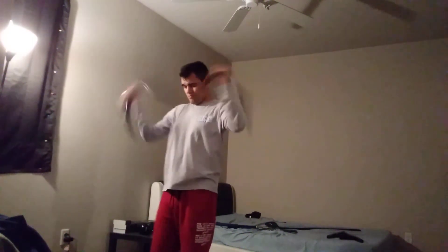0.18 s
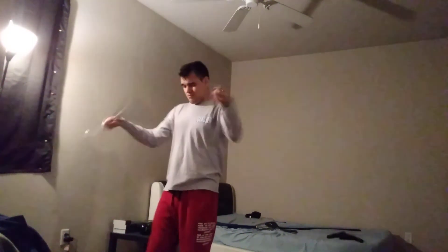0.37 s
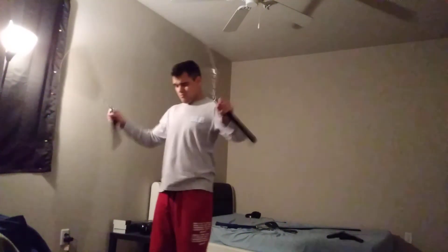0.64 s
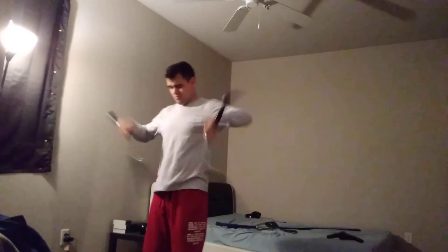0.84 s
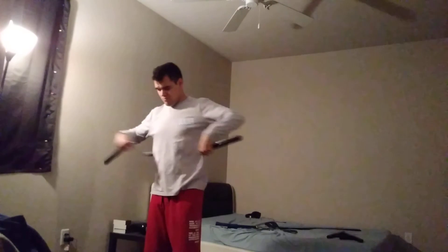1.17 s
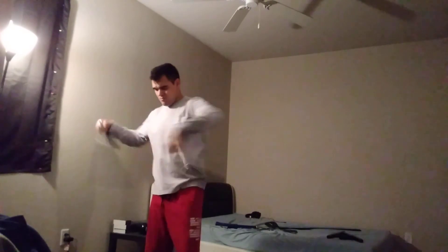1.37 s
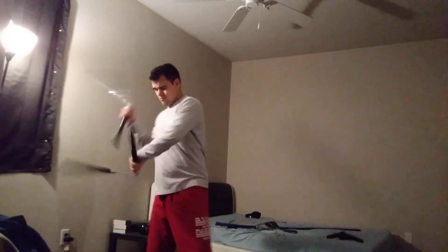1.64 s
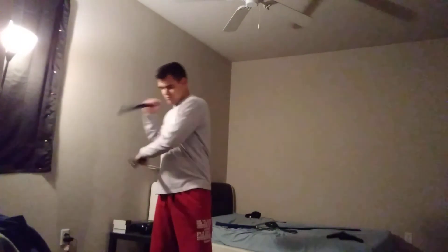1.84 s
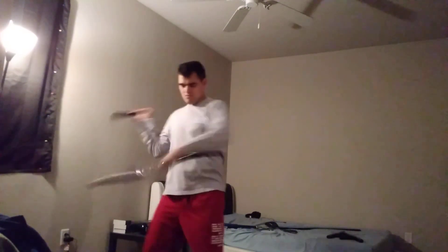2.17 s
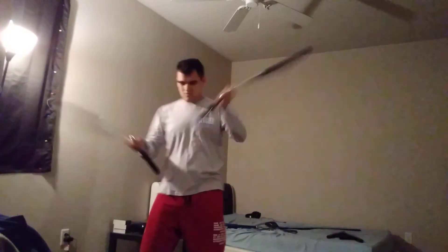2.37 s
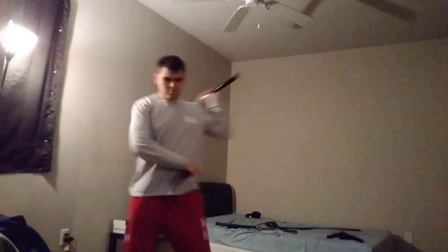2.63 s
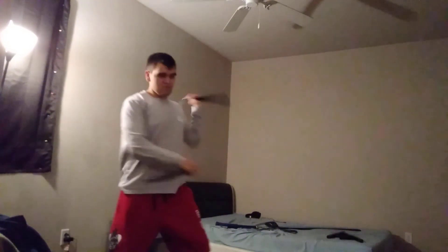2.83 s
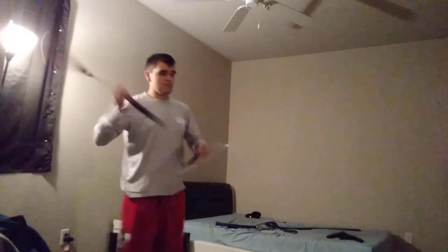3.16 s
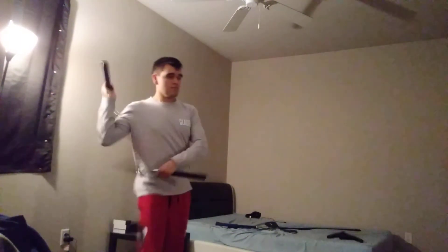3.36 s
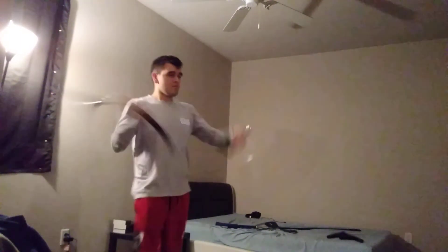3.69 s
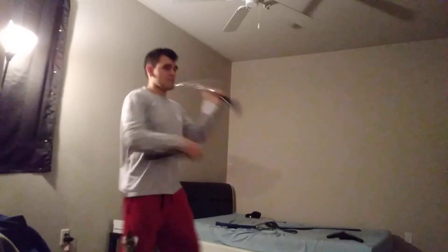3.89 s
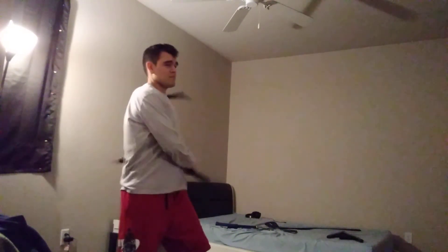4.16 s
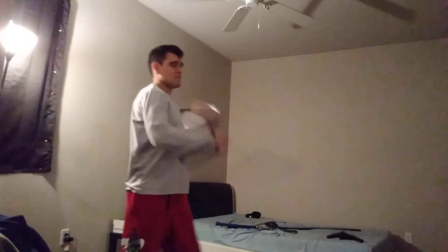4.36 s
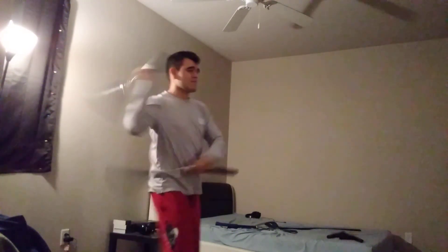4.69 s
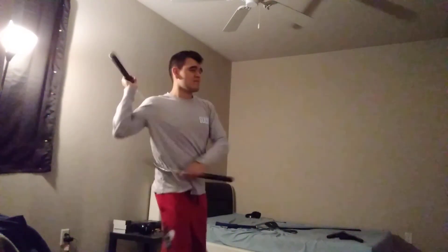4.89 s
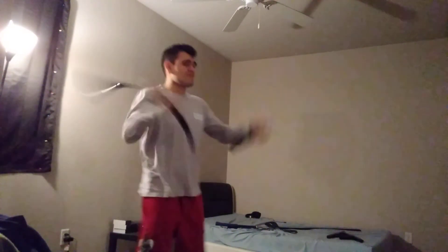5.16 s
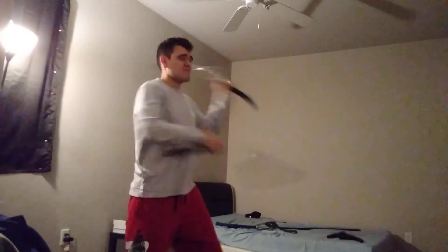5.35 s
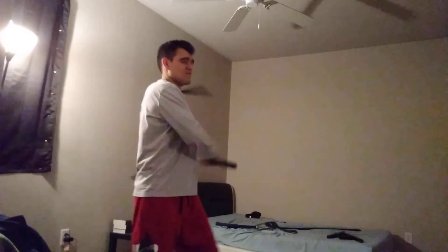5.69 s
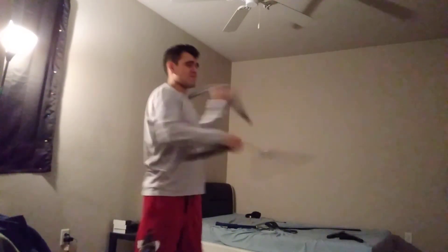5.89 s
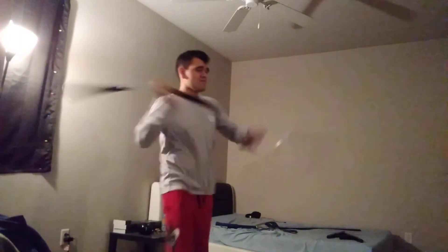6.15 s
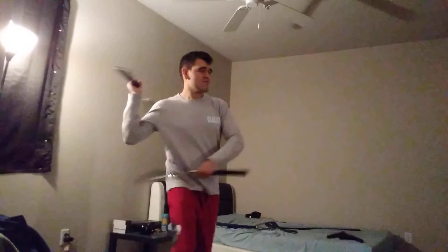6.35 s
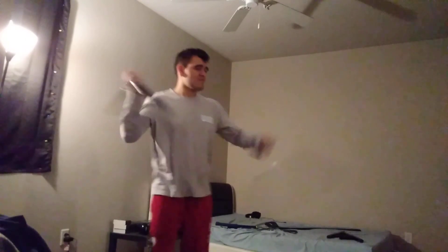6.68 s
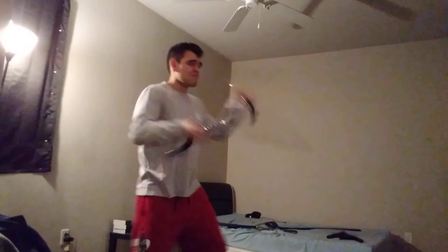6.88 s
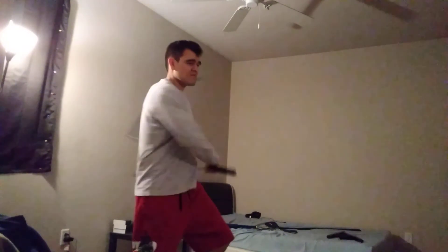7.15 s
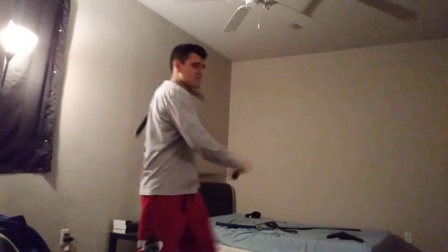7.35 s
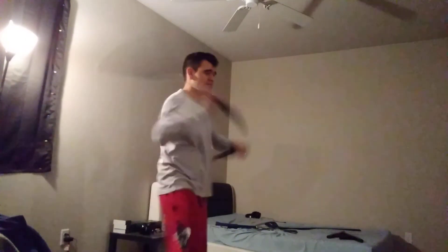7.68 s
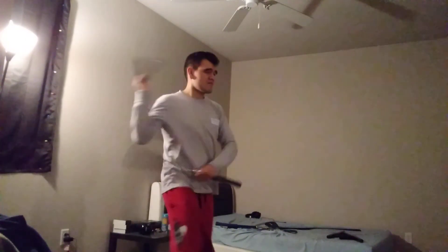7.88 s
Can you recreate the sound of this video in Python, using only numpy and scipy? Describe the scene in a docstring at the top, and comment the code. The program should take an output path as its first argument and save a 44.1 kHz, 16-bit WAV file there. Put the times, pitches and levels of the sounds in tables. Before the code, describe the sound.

Two pairs of chained sticks whirl in a bare room: bright metallic clinks and rattle, soft low whooshes, and one hard crash late on.

```python
"""Two pairs of chained sticks are whirled in a bare bedroom, a few metres from a pair of spaced microphones.
First comes a dense burst of clinks, rattle and wood knocks: contacts that set metal and wood modes ringing.
Lighter clinks follow, with short low whooshes and thin whistles of resonant noise, and booms as feet load the floor.
Near 5.7 s the chains and sticks crash hardest, then scattered light clinks and whooshes run to the end.
Throughout, the walls add a bright half-second tail, over a faint hiss of steady noise bands."""
import sys
import numpy as np
from scipy import signal
from scipy.fft import rfft, irfft
from scipy.io import wavfile
from scipy.ndimage import uniform_filter1d

SR = 44100
rng = np.random.default_rng(int(sys.argv[2]) if len(sys.argv) > 2 else 0)


def wav_out(sig):
    """Save sig, one row per channel (or a flat mono array), as 16-bit PCM at SR to the path in sys.argv[1]."""
    wavfile.write(sys.argv[1], SR, np.round(np.clip(np.atleast_2d(sig).T, -1, 1) * 32767).astype(np.int16))


N = 354123

# chain pulled tight or slapped: (t/s, level/dB, strongest ring f/Hz, treble share level/dB)
CHAIN_CLINKS = [(0.082, -40, 2920, -8), (0.104, -26, 4450, 3.5), (0.1185, -29.5, 3070, -2),
                (0.249, -35.5, 3180, -22), (0.311, -39, 2850, -3), (0.415, -32.5, 4400, -13),
                (0.4264, -28.5, 2110, 1.5), (0.452, -25, 2980, -5), (0.604, -38, 2500, 0),
                (0.8204, -45, 3020, -3.5), (0.857, -52, 5380, -10.5), (0.9851, -40, 5260, 12),
                (1.2423, -39.5, 7530, 5.5), (1.2582, -49, 3250, -7), (1.436, -44, 3280, 2),
                (1.5828, -47.5, 3230, 1.5), (1.8725, -51, 4640, -3), (1.956, -35.5, 4500, -11.5),
                (2.0142, -43.5, 3000, 3.5), (2.0296, -42.5, 4900, -4.5), (2.21, -49.5, 2670, -13),
                (2.3409, -35, 6450, -1.5), (2.5604, -46, 2270, -9), (2.6756, -37, 2580, 0.5),
                (2.855, -40, 2830, 1), (2.918, -37.5, 8950, 4), (2.9352, -37.5, 6290, 4.5),
                (2.9978, -35, 8000, 3.5), (3.063, -40, 2310, 8), (3.2139, -46.5, 3250, -26),
                (3.3232, -44, 2000, 3.5), (3.3928, -44.5, 3140, 11), (3.5333, -36.5, 2930, -8.5),
                (3.5492, -39.5, 3820, 8), (3.794, -46.5, 3140, -57), (3.856, -41.5, 2494, -1),
                (4.4218, -43, 9000, 2), (4.9781, -43, 2470, -13.5), (4.994, -35.5, 2960, -0.5),
                (5.672, -18.5, 2330, 1), (5.687, -16, 5180, 2.5), (6.062, -43.5, 11600, 1),
                (6.173, -42.5, 2830, 26), (6.2904, -49.5, 9750, 13.5), (6.4516, -46.5, 2140, -8.5),
                (6.4695, -49, 3255, 16), (6.592, -29, 9600, 9), (6.606, -38.5, 3090, 8),
                (6.6936, -46, 7700, -17), (6.9964, -44, 3190, -3.5), (7.048, -43.5, 3230, 10),
                (7.271, -44.5, 3300, -2), (7.3768, -41.5, 4800, 6.5), (7.395, -38.5, 8600, 13),
                (7.4136, -35.5, 6100, 8.5), (7.4281, -49, 6350, 13), (7.452, -35.5, 4640, 16),
                (7.7156, -53.5, 5400, 1), (7.8508, -38, 12200, 2.5)]
# metal modes of links and swivels, damped by hands and neighbours: (f/Hz, relative level/dB, t60 when held tight t/s)
LINK_MODES = [(2330, -3.5, 0.0045), (2997, 2.5, 0.0034), (3309, -1.5, 0.0055), (4310, -5.5, 0.0015),
              (5075, 0, 0.0029), (6530, -12, 0.0043), (7300, -4.5, 0.0031), (8410, 1, 0.0013),
              (9750, 0.5, 0.0024), (11130, 4, 0.00049), (11770, -13.5, 0.012), (14800, -21.5, 0.0012)]
# chain goes slack and its links rattle for a spell: (start t/s, hold t/s, level/dB, treble share level/dB)
CHAIN_SHAKES = [(0.0, 0.061, -63.5, -12.5), (0.078, 0.051, -54, -0.5), (0.241, 0.073, -58, 0.5),
                (0.383, 0.092, -56, 4), (0.573, 0.018, -55, -2), (0.82, 0.021, -59.5, -1),
                (1.245, 0.0064, -59, -6.5), (1.416, 0.1, -67, 0.5), (1.694, 0.14, -69, -2),
                (1.822, 0.094, -66, -6.5), (2.011, 0.044, -54.5, -4), (2.199, 0.043, -65.5, 0),
                (2.458, 0.036, -65, -6.5), (2.569, 0.0035, -62, -3), (2.655, .18, -65, -1),
                (2.914, 0.13, -67, 4.5), (3.107, .4, -65.5, -4), (3.529, 0.023, -59, -1),
                (3.758, 0.21, -68, -5.5), (3.661, 0.063, -67, -5.5), (3.853, 0.24, -74, -16),
                (4.203, 0.069, -61.5, 0), (4.422, 0.11, -61.5, 1), (4.622, 0.076, -66.5, -1),
                (4.73, 0.035, -68.5, -3), (4.905, 0.087, -61.5, -5.5), (4.961, 0.023, -66, 9),
                (5.096, 0.088, -76, 0), (5.31, 0.1, -66.5, -3.5), (5.658, 0.04, -37, 0),
                (5.87, 0.12, -65, 0), (6.026, 0.069, -59, -3.5), (6.166, 0.038, -63, -1.5),
                (6.445, 0.012, -59.5, -8.5), (6.579, 0.014, -53.5, -2), (6.729, 0.055, -65, -6.5),
                (6.996, 0.11, -70.5, 0.5), (7.269, 0.025, -60, 1.5), (7.365, 0.22, -63, 0.5),
                (7.594, 0.028, -55, -0.5), (7.711, 0.1, -63, -1.5)]
SHAKE_RISE_S, SHAKE_FALL_DB_PER_S = 0.011, 210.5
# pitched strikes, stick on stick or a free link ringing on its own: (t/s, level/dB, strongest ring f/Hz)
PITCHED_STRIKES = [(0.103, -40, 1137), (0.107, -44.5, 1540), (0.303, -56, 1350), (0.417, -40.5, 1570),
                   (0.454, -36.5, 960), (0.477, -38, 960), (0.525, -41.5, 1030), (0.987, -48, 1760),
                   (0.986, -43.5, 3330), (1.001, -47.5, 3310), (2.041, -54, 1450), (2.342, -55.5, 1520),
                   (3.885, -50, 2330), (4.495, -54.5, 2360), (4.512, -47.5, 2430), (4.537, -54.5, 2330),
                   (4.654, -51, 2330), (4.99, -52, 1000), (5.671, -23, 1170), (5.675, -25, 1760),
                   (5.687, -21, 1170), (6.998, -50, 2460), (7.021, -55.5, 3190), (7.052, -48.5, 2556)]
# wood modes of the sticks: (f/Hz, relative level/dB, t60 t/s)
WOOD_MODES = [(754, -14, 0.018), (960, -3, 0.0076), (1170, 8, 0.015), (1450, -8.5, 0.014),
              (1760, -16, 0.015), (2330, -2.5, 0.034), (3650, 3.5, 0.019)]
# stick shedding vortices on a fast swing: (top speed t/s, level/dB, shedding f/Hz, length t/s)
STICK_WHOOSHES = [(1.25, -50.5, 189, 0.0233), (1.7, -59, 417, 0.03), (1.87, -60, 463, 0.027),
                  (2.1, -57.5, 330, 0.021), (2.25, -58, 200, 0.11), (2.3, -67, 456, 0.1),
                  (2.5, -62.5, 600, 0.015), (3.2, -50, 330, 0.03), (3.53, -57.5, 229, 0.03),
                  (3.72, -58.5, 470, 0.034), (4.27, -50, 200, 0.042), (4.33, -64, 640, 0.033),
                  (4.65, -67.5, 218, 0.056), (5.21, -52, 199, 0.034), (5.62, -56, 228, 0.026),
                  (5.75, -50.5, 191, 0.023), (6.3, -57.5, 173, 0.068), (6.52, -58, 201.5, 0.067),
                  (6.82, -55, 212.6, 0.036), (7.49, -53.5, 189, 0.027), (7.8, -57.5, 178, 0.054)]
# thin whistles and squeaks of the whirling chain: (middle t/s, level/dB, f/Hz, length t/s)
CHAIN_WHISTLES = [(.03, -63.5, 8030, 0.11), (3.41, -68, 1055, 0.076), (5.02, -61.5, 1048, 0.036),
                  (5.355, -43.5, 8100, 0.013), (5.43, -59, 8210, 0.051), (5.45, -67, 1087, 0.059),
                  (7.58, -60, 1050, 0.084)]
# weight coming down on the floor: (full load t/s, hold t/s, level/dB)
FOOTSTEPS = [(0.0, 0.038, -64), (0.44, 0.203, -63), (1.202, 0.015, -56), (1.426, 0.3, -61),
             (1.784, 0.014, -51.5), (2.098, 0.043, -61.5), (2.664, 0.042, -54.5), (2.98, 0.012, -65),
             (3.21, 0.39, -63), (3.663, 0.29, -65), (4.302, 0.13, -62), (4.66, 0.047, -60.5),
             (5.448, 0.093, -77.5), (5.732, 0.038, -50.5), (6.289, 0.086, -61), (7.5, 0.05, -63.5),
             (7.817, 0.037, -59)]
STEP_RISE_DB_PER_S, STEP_FALL_DB_PER_S = 229.5, 128
# lowest modes of floor and room: (f/Hz, width f/Hz, relative level/dB)
FLOOR_MODES = [(52.7, 20, 4), (122.82, 2.3, 23), (145, 2.6, 17.5)]
# colour of the steady hiss: (f/Hz, relative level per Hz/dB)
HISS_SPECTRUM = [(30, -9), (60, -2.5), (130, 3), (370, -3), (780, -6.5), (1400, -16), (2600, -14.5),
                 (4900, -21.5), (8400, -18), (14000, -27), (16000, -30)]
HISS_DB = -63.5
# left-right likeness of spread noise: (f/Hz, likeness 0 to 1)
STEREO_LIKENESS = [(60, 0.91), (130, 1), (290, .8), (640, 0.32), (1400, 0.037)]
# decay of the room tail: (f/Hz, t60 t/s)
ROOM_DECAY = [(300, 0.24), (2000, 0.57), (8000, 0.46), (14000, 0.1)]
# first wall echoes: (delay t/s, level/dB)
WALL_ECHOES = [(.0035, 3), (0.0185, -6), (0.039, -18)]
# left microphone over right: (f/Hz, level/dB)
LEFT_OVER_RIGHT = [(60, 0.5), (150, 2.5), (300, 0), (6000, -1), (12000, 3.5)]


def from_db(db):
    """Decibels to gain."""
    return 10 ** (np.asarray(db) / 20)


def rms_one(x):
    """Scale to unit rms."""
    return x / np.sqrt(np.mean(x ** 2) + 1e-20)


def at_hz(points, hz):
    """Read a curve on a log-frequency axis."""
    curve_hz, value = np.array(points).T
    return np.interp(np.log(hz), np.log(curve_hz), value)


def ring(clicks, hz, t60):
    """A struck mode: a unit click sets a decaying sine of starting height 1 ringing."""
    r = from_db(-60 / (t60 * SR))
    w = 2 * np.pi * hz / SR
    return signal.lfilter([0, np.sin(w)], [1, -2 * r * np.cos(w), r * r], clicks + 1e-18)


def resonance(x, hz, width_hz):
    """Two-pole peak of gain 1."""
    r = np.exp(-np.pi * width_hz / SR)
    feedback = [1, -2 * r * np.cos(2 * np.pi * hz / SR), r * r]
    return signal.lfilter([(1 - r * r) / 2, 0, (r * r - 1) / 2], feedback, x)


def band(x, low, high):
    """Butterworth band-pass."""
    return signal.sosfilt(signal.butter(2, [low, high], "band", fs=SR, output="sos"), x)


def high_pass(x, hz):
    """Steep Butterworth high-pass."""
    return signal.sosfilt(signal.butter(4, hz, "high", fs=SR, output="sos"), x)


def pair(noise, hz):
    """Two noises mixed into left and right with the likeness that the microphone spacing gives."""
    alike = np.clip(at_hz(STEREO_LIKENESS, hz), 0, 1)
    middle = np.sqrt((1 + alike) / 2) * noise[0]
    side = np.sqrt((1 - alike) / 2) * noise[1]
    return middle + side * [[1], [-1]]


def clinks(tick_db=-12.0, crack_s=0.0029, ring_db=-7.5, ring_cycles=48.0, hard_db=-24.0, crash=0.3):
    """One hard contact and smaller ones strike all link modes with a dry tick; a free link rings at its own pitch."""
    s, db, strongest, treble = np.transpose(CHAIN_CLINKS)
    strengths = rng.standard_normal((len(s), 20))
    out = np.zeros((2, N + SR))
    lag = (9 * rng.random(len(s)) + 10).astype(int)   # samples, from where the chain is between the microphones
    spread_db = 2   # each clink favours other modes
    choked = np.maximum(db - hard_db, 0)   # hard blows jam the links together, so the free ring loses dB
    for k, at in enumerate((s * SR).astype(int)):
        fade = np.exp(-np.arange(2048) / SR / (crack_s * (1 + choked[k] / 5)))   # hard blows clatter longer
        contacts = .03 * rng.standard_normal(2048) ** 3 * fade
        contacts[0] = 1
        crack = 0
        for m, (hz, mode_db, t60) in enumerate(LINK_MODES):
            gain_db = mode_db + spread_db * strengths[k, m] + treble[k] * (hz > 5800)
            crack = crack + ring(contacts, hz, t60) * (-1) ** m * from_db(gain_db)
        free = ring(contacts, strongest[k], ring_cycles / strongest[k])
        sound = crack / np.abs(crack).max()
        sound += from_db(ring_db - choked[k]) * free / np.abs(free).max()
        sound += from_db(tick_db + crash * choked[k]) * contacts   # hard blows crash over all pitches
        sound *= from_db(db[k])
        out[0, at:at + 2048] += sound
        out[1, at + lag[k]:at + lag[k] + 2048] += sound
    return out[:, :N]


def rattle():
    """Uneven link contacts; each strikes every mode with its own strength, and loose links ring longer."""
    t = np.arange(N) / SR
    loud = np.zeros((2, N))   # envelopes of the modes below and above 5800 Hz
    for s, hold, db, treble in CHAIN_SHAKES:
        span = slice(int(s * SR), int((s + abs(hold) + .4) * SR))
        since = t[span] - s
        rise = np.clip(since / SHAKE_RISE_S, 0, 1) ** 2
        fall_db = SHAKE_FALL_DB_PER_S * np.maximum(since - SHAKE_RISE_S - hold, 0)
        loud[:, span] += rise * from_db(db - fall_db + np.array([[0], [treble]]))
    looser = 2   # times the ring of a link held tight
    clump = np.repeat(rng.standard_normal(N // 600 + 1), 600)[:N]   # links meet in clumps of 14 ms
    hits = rng.random(N) < 650 * from_db(3 * clump) / SR   # 650 contacts/s in a middling clump
    sizes = from_db(4 * np.minimum(rng.exponential(1, N), 3.5)) * hits
    chance = rng.standard_normal(N)
    out = np.zeros((2, N))
    lags = rng.integers(10, 19, len(LINK_MODES))   # samples, right after left
    for k, (hz, mode_db, t60) in enumerate(LINK_MODES):
        own = np.roll(chance, 997 * k)
        favour_db = 2.5 * np.roll(clump, 6000 * (k + 1))   # each clump favours other modes
        blows = sizes * np.sign(own) * from_db(4 * np.roll(own, 1) + favour_db)
        steady = np.sqrt(np.mean(ring(blows, hz, looser * t60) ** 2))
        shaken = blows * loud[int(hz > 5800)] * from_db(mode_db)
        rung = ring(shaken, hz, looser * t60) / steady
        out += [rung, np.roll(rung, lags[k])]
    return out / np.sqrt(5)   # five modes share the lower band


def pitched_strikes(peak_db=21.5, hard_db=-33.0, spread=1.0):
    """A pitched strike: the grip pulls the nearest mode onto the strongest ring; hard blows wake the other
    modes."""
    strengths = rng.standard_normal((len(PITCHED_STRIKES), 8))
    out = np.zeros(N + SR)
    click = np.eye(1, 4096)[0]
    for (s, db, strongest), chance in zip(PITCHED_STRIKES, strengths):
        nearest = np.argmin(np.abs(np.log(np.array(WOOD_MODES)[:, 0] / strongest)))
        others_db = min(spread * max(db - hard_db, 0) - peak_db, 0)
        sound = 0
        for k, (hz, mode_db, t60) in enumerate(WOOD_MODES):
            if k == nearest:
                sound = sound + ring(click, strongest, t60)
            else:
                sound = sound + from_db(mode_db + others_db + 2 * chance[k]) * ring(click, hz, t60)
        out[int(s * SR):][:len(click)] += from_db(db) * sound
    return np.array([out, np.roll(out, 12)])[:, :N]   # right 12 samples later


def air_tones(rows, sharpness):
    """Noise twice through a resonance at the shedding pitch, swelling and fading with the swing."""
    out = np.zeros((2, N))
    t = np.arange(N) / SR
    for s, db, hz, length in rows:
        span = slice(max(int((s - .4) * SR), 0), int((s + .4) * SR))
        noise = rng.standard_normal((2, SR))[:, :len(t[span])]
        width_hz = hz / sharpness
        tone = rms_one(resonance(resonance(noise, hz, width_hz), hz, width_hz))
        swell = np.exp(-.5 * ((t[span] - s) / length) ** 2)
        out[:, span] += pair(tone, hz) * from_db(db - 3.0) * swell
    return out


def room(x, tail_db=-27.5, build_s=0.0014):
    """A few wall echoes, then a dense tail that dies at its own pace in each octave, unrelated left and right."""
    t = np.arange(int(.7 * SR)) / SR
    tail = 0
    for low in 100 * 2 ** np.arange(0, 8.):
        high = 2 * low
        noise = band(rng.standard_normal((2, len(t))), low, min(high, .45 * SR))
        tail = tail + noise * from_db(-60 * t / at_hz(ROOM_DECAY, np.sqrt(low * high)))
    tail = tail * from_db(tail_db) * (1 - np.exp(-t / build_s))
    for s, db in WALL_ECHOES:
        arrival = (s * SR + rng.uniform(-17, 17, 2)).astype(int)   # samples, a little apart left and right
        tail[[0, 1], arrival] += from_db(db)
    return signal.fftconvolve(x, tail, axes=1)[:, :N]


def boom():
    """Each step loads the floor quickly and lets go slowly; the lowest modes of floor and room answer."""
    t = np.arange(N) / SR
    load = 0
    for s, hold, db in FOOTSTEPS:
        rise_db = STEP_RISE_DB_PER_S * np.maximum(s - t, 0)
        fall_db = STEP_FALL_DB_PER_S * np.maximum(t - s - hold, 0)
        load = load + from_db(db - rise_db - fall_db)
    noise = rng.standard_normal((2, N))
    modes = 0
    for hz, width_hz, db in FLOOR_MODES:
        modes = modes + from_db(db) * pair(rms_one(resonance(noise, hz, width_hz)), hz)
    return rms_one(modes) * load


def hiss():
    """Half-octave bands of steady noise; neighbours are unrelated."""
    white = rng.standard_normal((2, 2, N))
    edges = 22 * 2 ** np.arange(0, 9.6, .5)
    out = 0
    for k, (low, high) in enumerate(zip(edges, edges[1:])):
        hz = np.sqrt(low * high)
        out = out + from_db(at_hz(HISS_SPECTRUM, hz)) * pair(band(white[k % 2], low, high), hz)
    return from_db(HISS_DB) * rms_one(out)


def microphones(x):
    """The two microphones differ a little in tone; both lose the lowest bass and the very top."""
    hz = np.maximum(np.fft.rfftfreq(N, 1 / SR), 1)
    lift = from_db(at_hz(LEFT_OVER_RIGHT, hz) / 2 * np.array([[1], [-1]]))
    return irfft(rfft(high_pass(x, hz=45)) * lift * (hz < 15800), N)


def suppressor(x, margin_db=5.0, hold=0.8, deepest_db=-10.0):
    """What does not stand clear of the quietest level in its band is turned down, so tails end early."""
    spectra = signal.stft(x, nperseg=512)[2]
    power = uniform_filter1d(np.mean(np.abs(spectra) ** 2, axis=0), size=3, axis=0)
    power = signal.lfilter([1 - hold], [1, -hold], power) + 1e-20   # smoothed over time
    noise = np.percentile(power, 10, axis=1, keepdims=True) * from_db(margin_db) ** 2
    gain = np.maximum(1 - noise / power, from_db(deepest_db))
    return signal.istft(spectra * gain, nperseg=512)[1][:, :N]


def scene():
    """Struck things and air tones go through the room; floor and hiss are already spread."""
    metal = high_pass(clinks() + rattle(), hz=1945)   # small bodies radiate no bass
    pitched = high_pass(pitched_strikes(), hz=733)
    struck = metal + pitched
    air = air_tones(STICK_WHOOSHES, sharpness=3.8) + air_tones(CHAIN_WHISTLES, sharpness=26.0)
    return struck + room(struck + from_db(-16.5) * air) + air + boom() + hiss()


def top_cut(x):
    """Nothing passes above the cut-off."""
    return signal.sosfilt(signal.butter(12, 16630, fs=SR, output="sos"), x)


def record(dry):
    """The microphones pick up the scene, then a noise suppressor thins the quiet parts."""
    mix = suppressor(microphones(dry))
    return top_cut(mix)


dry = scene()
out = record(dry)
wav_out(out)
```